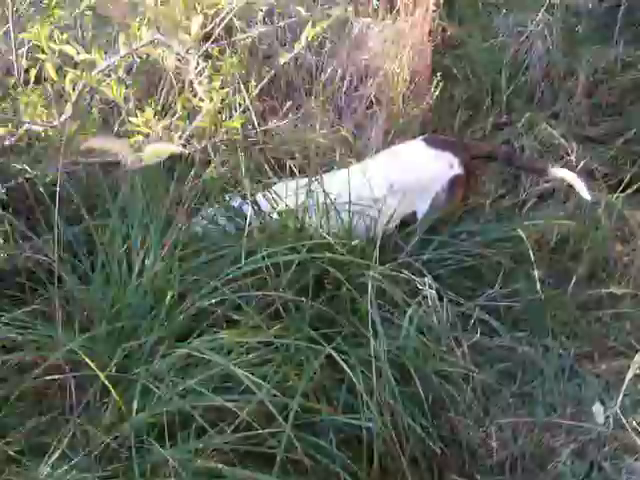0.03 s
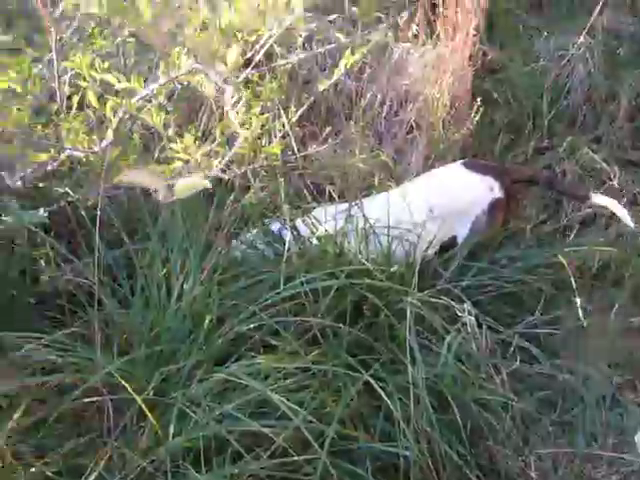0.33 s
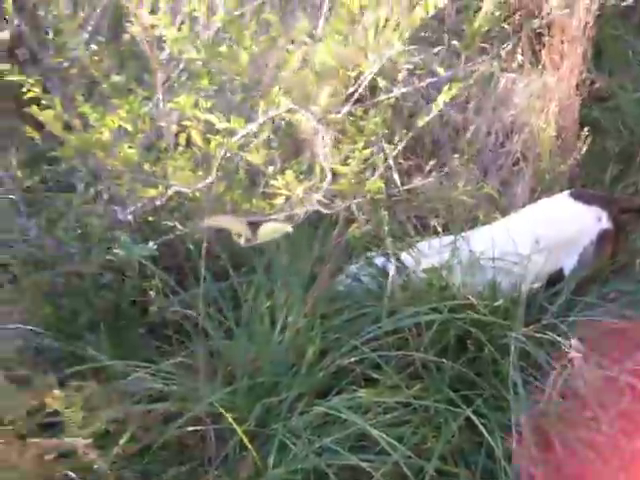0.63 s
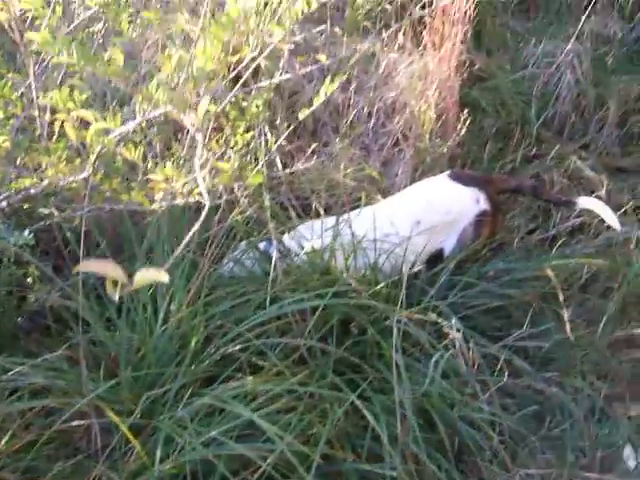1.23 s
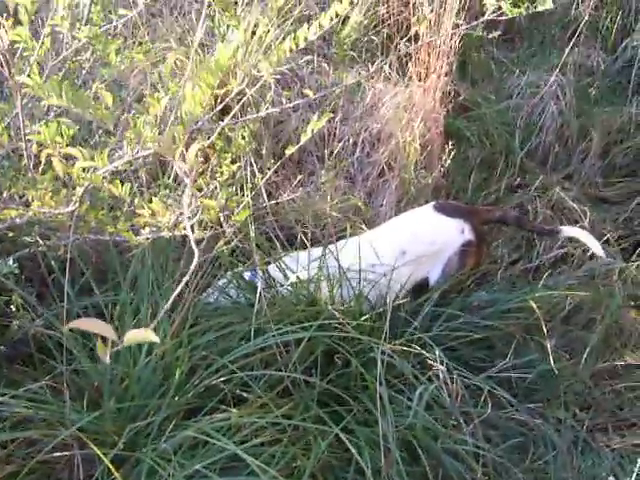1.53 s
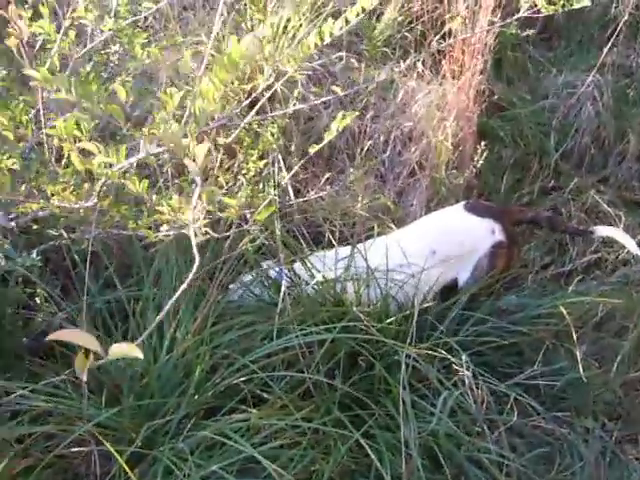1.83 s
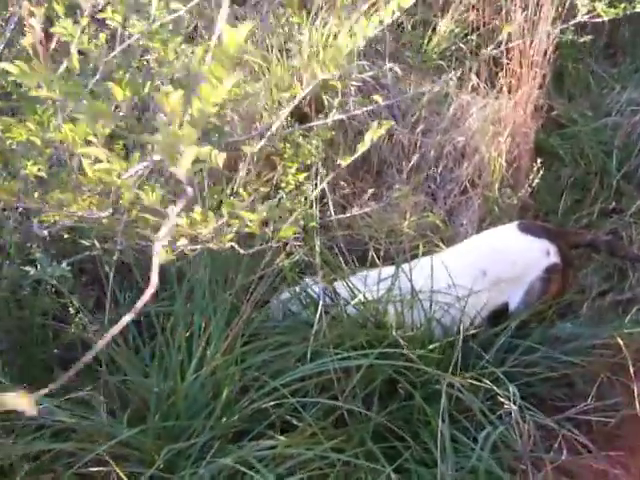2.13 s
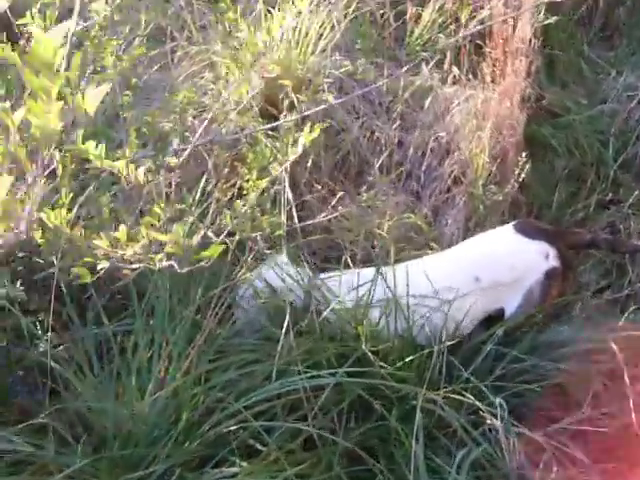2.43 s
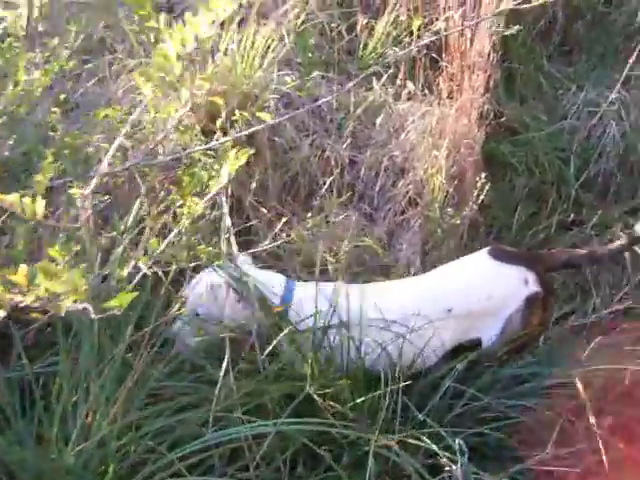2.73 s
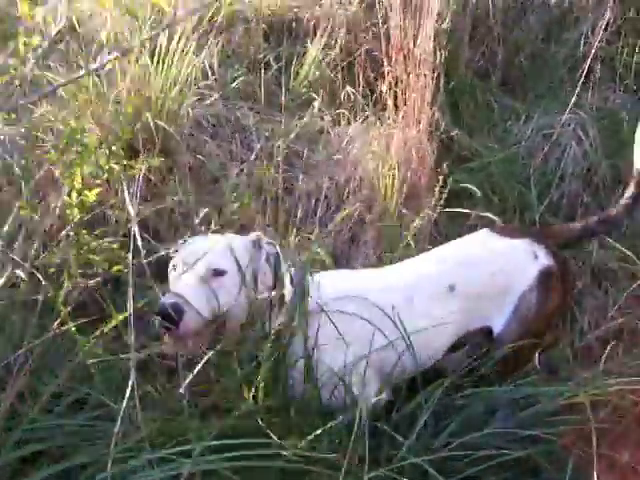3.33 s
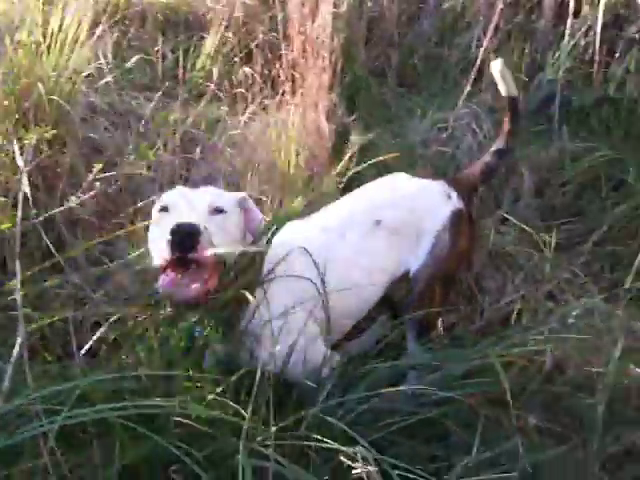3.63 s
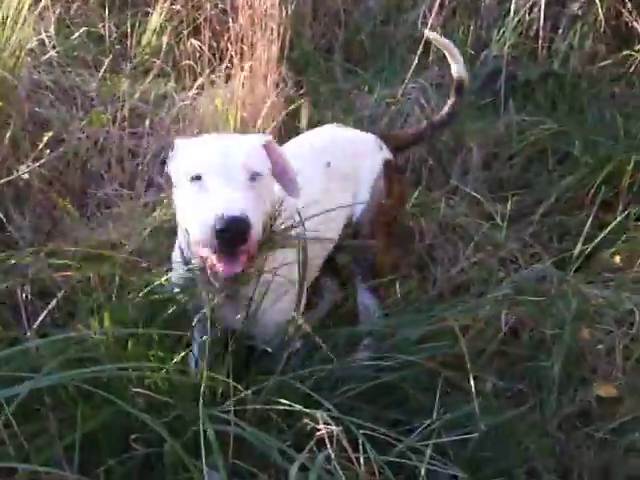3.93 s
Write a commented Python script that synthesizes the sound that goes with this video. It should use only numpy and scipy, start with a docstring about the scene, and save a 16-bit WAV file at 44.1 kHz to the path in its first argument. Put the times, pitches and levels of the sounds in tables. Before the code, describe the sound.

A dog laps water about three times a second, with wet smacks, small splashes, drips and low gulps heard nearby. The lapping thins out as tall grass rustles against its coat, over a faint outdoor hush.

```python
"""In tall grass by the water, a dog laps about three times a second, then lifts its head and turns.
Each lap is a wet smack and splash, a few ringing air bubbles and a low gulp as the tongue pulls out.
Drips fall from the muzzle in between, and the bank and stems throw back short echoes.
Grass blades rustle against the dog's coat as it moves, over a steady outdoor hush."""
import sys
import numpy as np
from scipy import signal
from scipy.fft import rfft, irfft
from scipy.io import wavfile

SR = 44100
rng = np.random.default_rng(int(sys.argv[2]) if len(sys.argv) > 2 else 0)


def transcribe(u):
    """Save the signal u as a 16-bit wav file named by the first command-line argument.

    u: samples, shape (n,) or (channels, n), limited to [-1, 1]; the rate is SR.
    q: integer samples, one column per channel.
    """
    v = np.clip(np.atleast_2d(u).T, -1, 1)
    q = np.round(v * 32767).astype(np.int16)
    wavfile.write(sys.argv[1], SR, q)


N = 176400  # 4 seconds
T = np.arange(N) / SR


def amp(db):
    """Turns decibels into a number to multiply by."""
    return 10 ** (np.asarray(db) / 20)


def unit(x):
    """Scales a sound to an average strength (rms) of 1."""
    return x / np.sqrt(np.mean(x ** 2) + 1e-20)


def add(mix, start_s, sound):
    """Adds a sound to the mix at the given time."""
    part = mix[max(round(start_s * SR), 0):][:len(sound)]
    part += sound[:len(part)]


def colour(x, points):
    """Shapes the tone of x along (frequency [Hz], level [dB]) points, at strength 1."""
    hz, db = np.transpose(points)
    f = np.fft.rfftfreq(len(x), 1 / SR)
    gain = amp(np.interp(np.log(f + 1), np.log(hz), db))
    return unit(irfft(rfft(x) * gain, len(x)))


def band(x, hz, octaves):
    """Keeps the frequencies around hz, at strength 1."""
    f = np.fft.rfftfreq(len(x), 1 / SR)
    distance = np.log2((f + 1) / hz) / octaves
    return unit(irfft(rfft(x) / (1 + distance ** 2) ** 3.15, len(x)))


def drift(seconds):
    """A smooth random wander; more seconds make it slower."""
    f = np.fft.rfftfreq(N, 1 / SR)
    return unit(irfft(rfft(rng.standard_normal(N)) * np.exp(-(f * seconds) ** 2), N))


def swells(rows):
    """A loudness curve of smooth bumps, each (middle [s], half length [s], level [dB])."""
    return sum(amp(db) * np.exp(-((T - s) / half) ** 2 / 2) for s, half, db in rows)


def crackle(grain_db, grain_s):
    """Noise clumped into tiny grains of uneven strength."""
    return unit(rng.standard_normal(N) * amp(grain_db * np.minimum(drift(grain_s), 2.5)))


def pings(per_s, low_hz, high_hz, cycles, spread_db):
    """A random shower of tiny pings; more cycles make each ring longer."""
    out, t = np.zeros(N), T[:SR // 20]
    pitches = np.geomspace(low_hz, high_hz, 24)
    for hz in pitches:
        age = t * hz / cycles
        ping = unit(age * np.exp(-age) * np.sin(2 * np.pi * hz * t))
        at = np.flatnonzero(rng.random(N) < per_s / len(pitches) / SR)
        hits = np.zeros(N)
        hits[at] = amp(spread_db * np.minimum(rng.exponential(1, N)[at], 3))
        out += signal.oaconvolve(hits, ping)[:N]
    return unit(out)


# Tone of the outdoor hush: (frequency [Hz], level [dB])
HUSH_TONE = [(20, -5), (150, -3), (330, 0), (750, -2), (1050, -1), (1500, -12), (2200, -4), (8000, -13.5)]
def hush(level_db=-50):
    """Faraway outdoor noise that wavers only a little."""
    return amp(level_db + 1.4 * drift(0.032)) * colour(rng.standard_normal(N), HUSH_TONE)


# How loud the grass is as the dog moves: (time [s], level [dB])
RUSTLE_LEVELS = [(.04, -46.5), (.21, -52), (.57, -49.5), (.64, -43.5), (.76, -45), (.82, -55.5),
                 (1.115, -41.5), (1.16, -51.5), (1.7, -54), (1.89, -42.5), (1.99, -50), (2.08, -40.5),
                 (2.2, -44), (2.42, -46.5), (2.55, -41), (2.67, -49), (2.79, -35.5), (2.9, -46.5),
                 (3.24, -41), (3.43, -41), (3.56, -36.5), (3.7, -41), (4.0, -44)]
# Tone of the scraping blades: (frequency [Hz], level [dB])
GRASS_TONE = [(100, -13.5), (400, -7), (1000, 3.5), (1650, -9), (2080, -1.5), (2400, -7), (2800, -1),
              (4000, -4), (5200, -5), (7200, 1), (8500, -11)]
def grass():
    """Blades scrape along the dog's coat and flick against each other."""
    level_db = np.interp(T, *np.transpose(RUSTLE_LEVELS)) + 1.47 * drift(0.01)
    flicks = pings(per_s=350, low_hz=3590, high_hz=7810, cycles=5.2, spread_db=7)
    scrape = colour(crackle(grain_db=2.5, grain_s=0.00041), GRASS_TONE)
    return amp(level_db) * unit(scrape + 0.33 * flicks)


# Swishes of long blades: (middle [s], half length [s], level [dB])
BLADE_SWISHES = [(.655, 0.031, -53), (2.8, 0.025, -40.5)]
def swishes():
    """Long blades slide over the coat with a thin, high hiss."""
    return swells(BLADE_SWISHES) * band(crackle(grain_db=2.5, grain_s=0.0024), hz=6800, octaves=0.19)


def spatter(level_db=-54.5):
    """Stray drops tick faintly on water and leaves."""
    return amp(level_db) * pings(per_s=170, low_hz=653, high_hz=7910, cycles=1.62, spread_db=5)


def gurgle(level_db=-56.5, churn_db=-52, lead_s=0.023, half_length_s=0.023):
    """Small bubbles keep forming and breaking in the stirred water, most loudly just before each gulp."""
    churn = swells([(s - lead_s, half_length_s, churn_db) for s, _, _ in TONGUE_GULPS])
    loudness = amp(level_db + 2 * drift(0.1)) + churn
    return loudness * pings(per_s=330, low_hz=477, high_hz=1950, cycles=1.42, spread_db=4)


# Splashes in the water: (middle [s], half length [s], level [dB])
WATER_SPLASHES = [(0.366, 0.0086, -34.5), (0.711, 0.016, -37.5), (0.792, 0.0056, -42.5),
                  (1.539, 0.012, -40.5), (2.788, 0.021, -41), (3.29, 0.019, -45.5), (3.545, 0.067, -47)]
# Tone of a splash: (frequency [Hz], level [dB])
SPLASH_TONE = [(80, -13.5), (250, 8.5), (600, -7), (1100, 4), (2000, 0.5), (2500, -19), (3600, 4),
               (5200, -6), (8500, -16)]
def splashes():
    """Tongue or paws stir up fine spray and small bursting bubbles."""
    bursts = pings(per_s=1500, low_hz=471, high_hz=7060, cycles=0.96, spread_db=3)
    spray = crackle(grain_db=3, grain_s=0.0029)
    return swells(WATER_SPLASHES) * colour(bursts + spray, SPLASH_TONE)


# Low gulps as the tongue leaves the water: (middle [s], pitch [Hz], level [dB])
TONGUE_GULPS = [(0.062, 257, -42), (0.362, 332, -35.5), (0.461, 310, -30), (0.797, 314.6, -34),
                (1.135, 308.7, -34), (1.553, 315, -40), (1.895, 294, -41.5), (2.239, 311, -43.5),
                (2.568, 314, -44.5), (3.887, 245, -44)]
def gulps(fall_per_s=45, note_s=0.0064, slosh_s=0.02):
    """A hollow opens under the tongue: water sloshes and a short, low note slides down."""
    out = np.zeros(N)
    t = T[:SR // 20] - 1 / 40  # zero at the middle of the gulp
    for s, hz, db in TONGUE_GULPS:
        cycles = np.cumsum(hz * np.exp(-fall_per_s * t)) / SR + rng.random()
        note = np.exp(-(t / note_s) ** 2) * np.sin(2 * np.pi * cycles)
        slosh = band(rng.standard_normal(len(t)), hz=453, octaves=2.6) * np.exp(-(t / slosh_s) ** 2)
        add(out, s + t[0], amp(db) * (note + 0.33 * slosh))
    return out


# Smacks of tongue and water: (time [s], level [dB], fade time [s], centre frequency [Hz])
TONGUE_SMACKS = [ (.108, -38.5, .007, 2280), (.1445, -32, 0.0024, 4830), (.298, -37.5, 0.005, 5200),
                 (.3615, -29.5, 0.0075, 3230), (.429, -22, 0.0032, 2150), (.686, -30, 0.0024, 3330),
                 (.761, -29, 0.0026, 4620), (.850, -31, 0.0027, 4180), (.877, -35, 0.002, 1790),
                 (.987, -36, 0.004, 2090), (1.064, -41, 0.0077, 1500), (1.117, -37, 0.0017, 1000),
                 (1.403, -29.5, 0.0053, 5230), (1.520, -38.5, 0.025, 5560), (1.547, -29, 0.0016, 1860),
                 (1.5823, -23, 0.0013, 6130), (1.633, -35, 0.0012, 4770), (1.789, -42, 0.021, 3900),
                 (1.946, -36, 0.0035, 4200), (2.1439, -19, 0.00086, 3080), (2.1446, -21.5, 0.0025, 1120),
                 (2.2305, -27.5, 0.0017, 4000), (2.3672, -32, .0012, 5860), (3.5605, -25, 0.0023, 5640),
                 (3.5752, -23.5, 0.0069, 2600), (3.629, -27.5, 0.003, 7040), (3.880, -36, 0.0016, 1000)]
def smacks(rise_s=0.0006):
    """Thin films of water snap, each with a sudden burst of noise."""
    out, t = np.zeros(N), T[:SR // 10]
    spray = crackle(grain_db=3, grain_s=0.0017)
    for k, (s, db, fade_s, hz) in enumerate(TONGUE_SMACKS):
        piece = np.roll(spray, -k * len(t))[:len(t)]  # each smack gets its own stretch of noise
        shape = np.minimum(t / rise_s, 1) * np.exp(-t / fade_s)
        add(out, s, amp(db) * band(piece, hz, octaves=1.67) * shape)
    return out


def one_bubble(t, hz, fade_s):
    """Trapped air opens with a small pop, then rings with a wobbly, slightly rising pitch."""
    age = t / fade_s
    wobble_noise, pop_noise = rng.standard_normal((2, len(t)))
    rise = 0.019 * rng.uniform(0.39, 2.36) * np.minimum(age, 3)
    wobble = 0.05 * band(wobble_noise, 1 / fade_s / np.pi, octaves=1)
    pitch = hz * (1 + rise + wobble)
    shape = (1 - np.exp(-(age / 0.55) ** 2)) * np.exp(-age)  # swells quickly, then fades
    pop = 0.059 * band(pop_noise, hz * 2, octaves=1.67) * np.exp(-age)
    return np.sin(2 * np.pi * np.cumsum(pitch) / SR) * shape / shape.max() + pop


# Bubbles from laps and drips: (time [s], pitch [Hz], level [dB], fade time [s])
AIR_BUBBLES = [ (0.035, 947, -28, 0.0071), (0.0443, 5440, -20, 0.0016), (.070, 5200, -27, 0.00066),
               (0.267, 2650, -35, 0.0029), (0.298, 2520, -31, 0.0029), (0.378, 4100, -27.5, 0.0025),
               (0.429, 1030, -28.5, 0.0037), (0.5926, 1110, -19, 0.00087), (.5945, 780, -22.5, 0.0021),
               (0.7, 6070, -31.5, 0.0025), (0.820, 924, -26, 0.0065), (.854, 6840, -31.5, 0.0021),
               (.912, 750, -38, 0.0029), (1.038, 1890, -34, 0.0041), (1.064, 1066, -35.5, 0.0083),
               (1.118, 587, -35, 0.0067), (1.168, 864, -35, 0.0039), (1.245, 6040, -34.5, 0.0017),
               (1.477, 2090, -35.5, 0.0059), (1.52, 1250, -32, 0.0057), (1.526, 1826, -28.5, 0.0028),
               (1.443, 557, -36.5, 0.0043), (1.574, 870, -32, 0.0035), (1.632, 3720, -30, 0.0016),
               (1.752, 2830, -31, 0.0036), (1.845, 1960, -25, 0.0046), (1.868, 1056, -28.5, 0.0074),
               (2.1444, 730, -15.5, 0.0016), (2.149, 1330, -31.5, 0.0036), (2.157, 4460, -29.5, 0.003),
               (2.232, 4340, -32, 0.0021), (2.571, 1190, -34.5, 0.0033), (2.573, 3640, -29.5, 0.0019),
               (2.637, 1137, -28.5, 0.0038), (2.669, 680, -32.5, 0.0021), (2.679, 4050, -32, 0.0022),
               (3.177, 578, -34.5, 0.0065), (3.462, 765, -37.5, 0.009), (3.591, 787, -29.5, 0.0048),
               (3.593, 2760, -33, 0.0033), (3.881, 880, -22, 0.00095), (3.969, 1260, -29.5, 0.0051)]
def bubbles(shed_count=3, shed_db=-11, shed_within_s=0.011, shed_octaves=1.3):
    """Laps and drips trap air bubbles; each rings and sheds a few weaker ones of nearby pitch."""
    out, t = np.zeros(N), T[:SR // 10]
    for s, hz, db, fade_s in AIR_BUBBLES:
        add(out, s, amp(db) * one_bubble(t, hz, fade_s))
        for late, shift in rng.random((shed_count, 2)):
            shed_hz = hz * 2 ** (shed_octaves * (shift - 1 / 3))
            shed = one_bubble(t, shed_hz, fade_s / 2)
            add(out, s + shed_within_s * late, amp(db + shed_db) * (1 - late / 2) * shed)
    return out


def with_echoes(x, level_db=-9, fade_s=0.01):
    """Sound bounces off the bank and stems, adding many quick, weak echoes."""
    t = T[:SR // 8]
    echoes = rng.standard_normal(len(t)) * (rng.random(len(t)) < 0.05)
    echoes *= (t > 0.002) * np.exp(-t / fade_s)  # none returns in the first 2 ms
    return x + amp(level_db) * signal.fftconvolve(x, echoes / np.linalg.norm(echoes))[:N]


def scene():
    """Mixes the water, the grass and the hush into one channel."""
    lapping = with_echoes(bubbles() + smacks() + gulps() + spatter())
    return (lapping + splashes() + gurgle() + grass() + swishes() + hush())[None]


def record(dry, start_s=0.036, top_hz=8500):
    """The sound starts after a moment of silence, with its highest treble cut away."""
    lowpass = signal.firwin(161, top_hz, window=("kaiser", 8), fs=SR)
    return signal.oaconvolve(dry * (T >= start_s), lowpass[None], "same")


dry = scene()
out = record(dry)
transcribe(out)
```